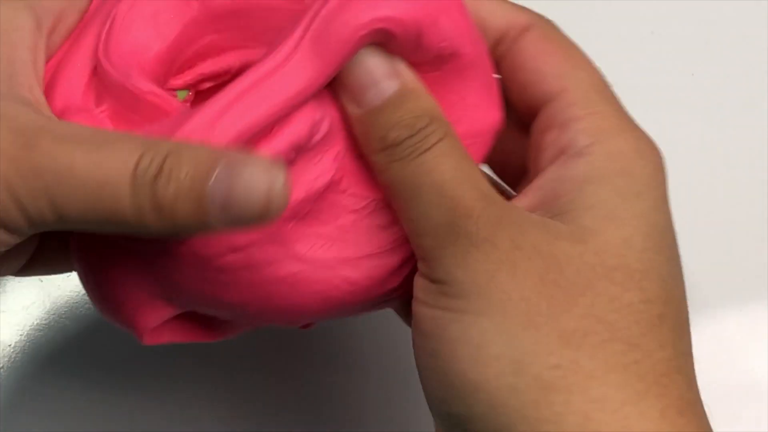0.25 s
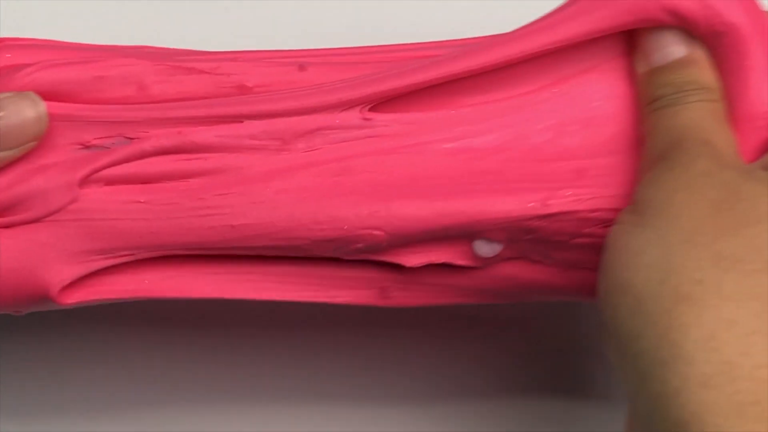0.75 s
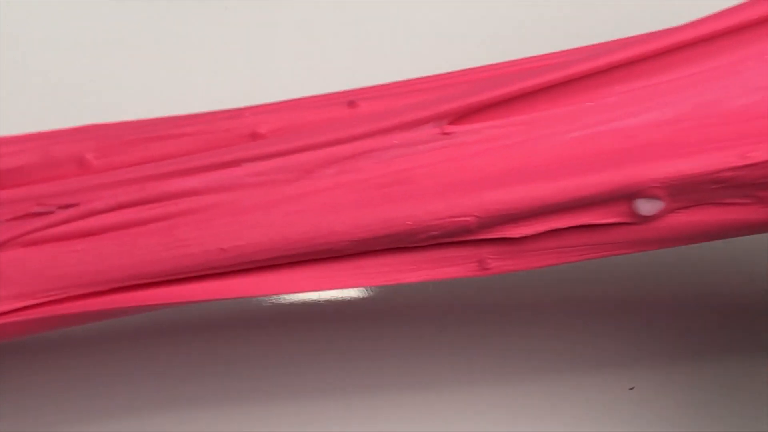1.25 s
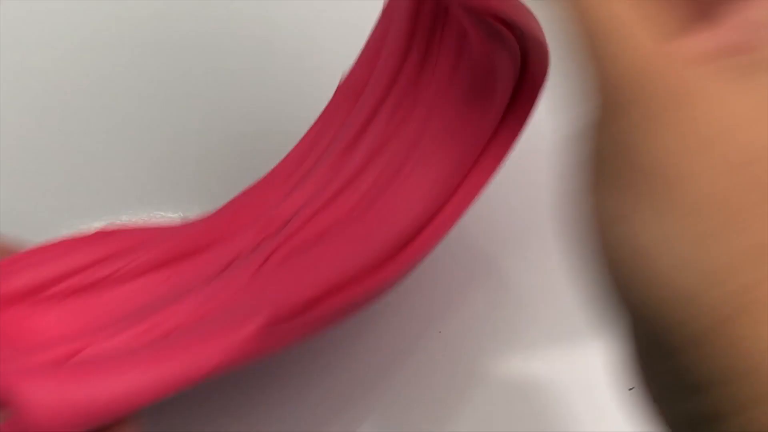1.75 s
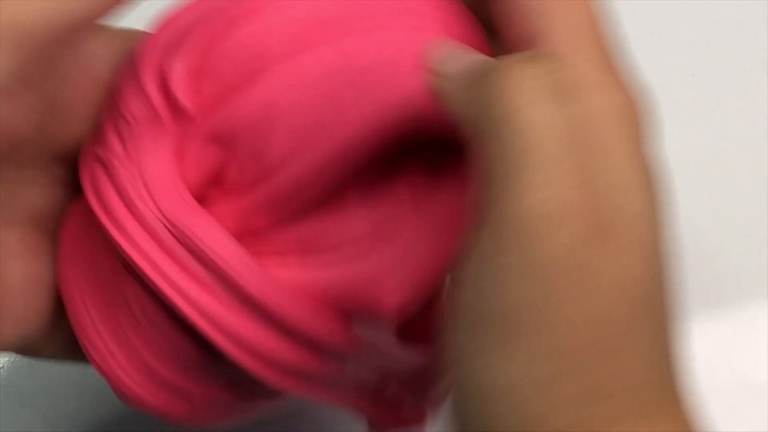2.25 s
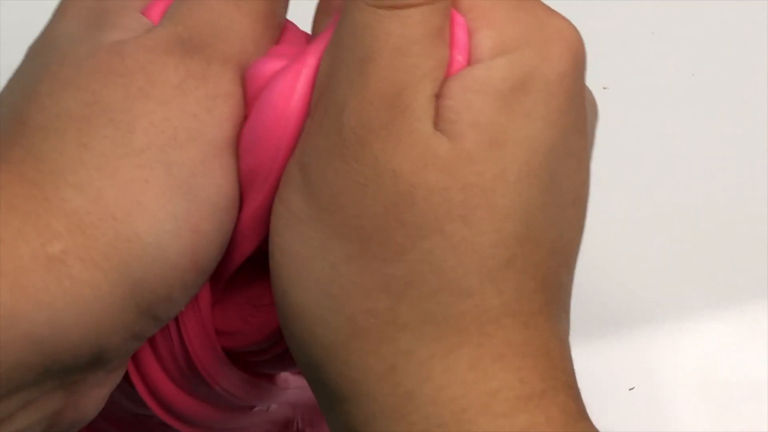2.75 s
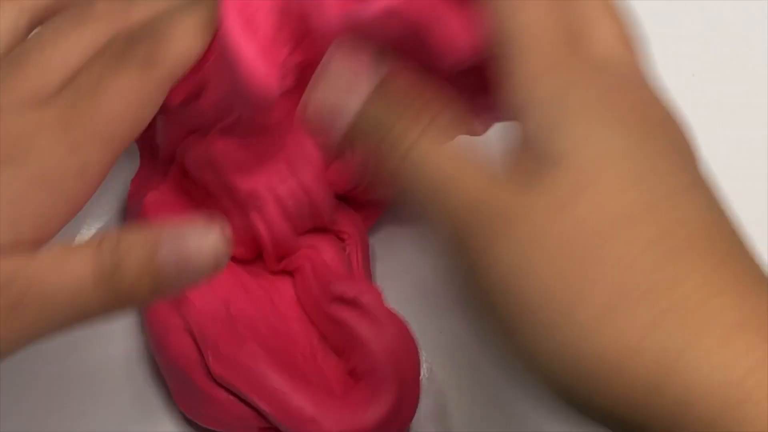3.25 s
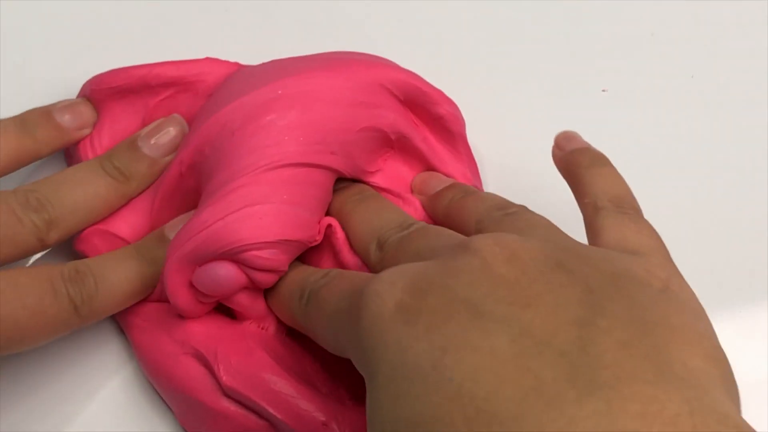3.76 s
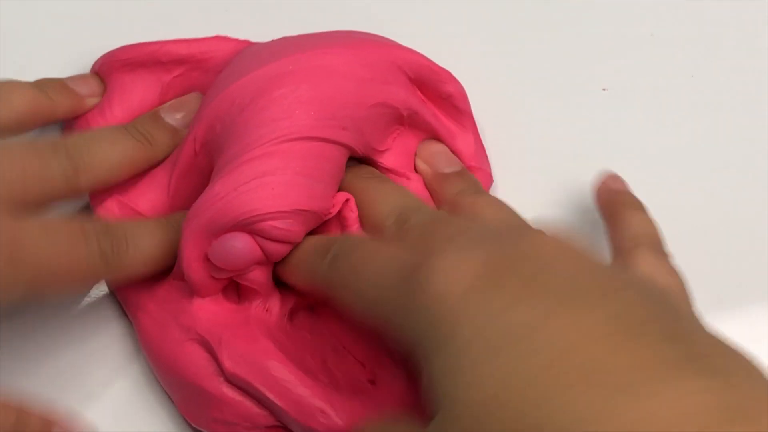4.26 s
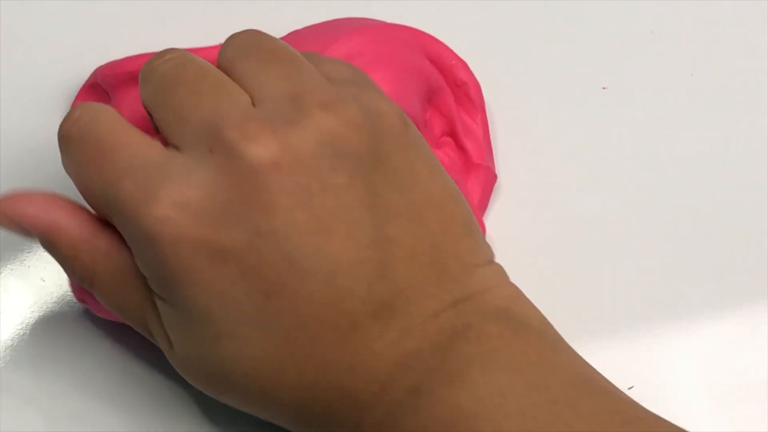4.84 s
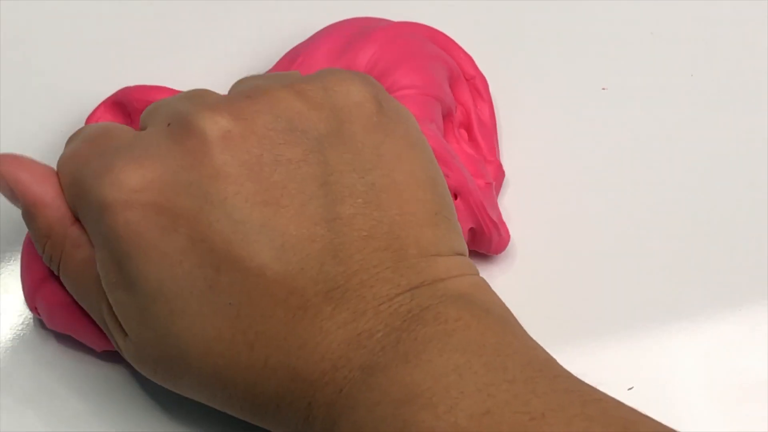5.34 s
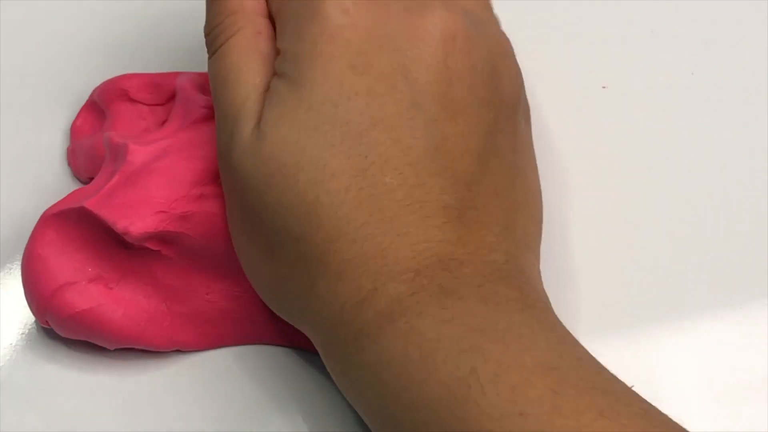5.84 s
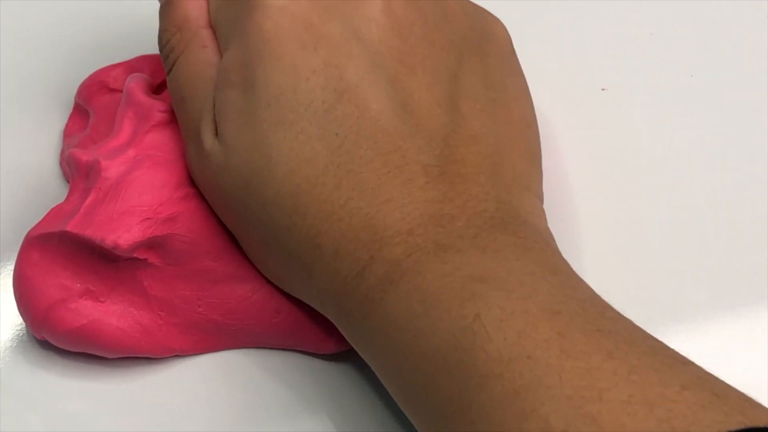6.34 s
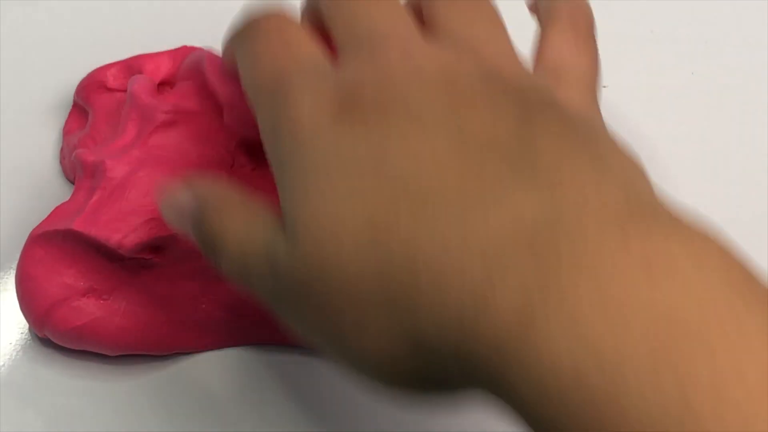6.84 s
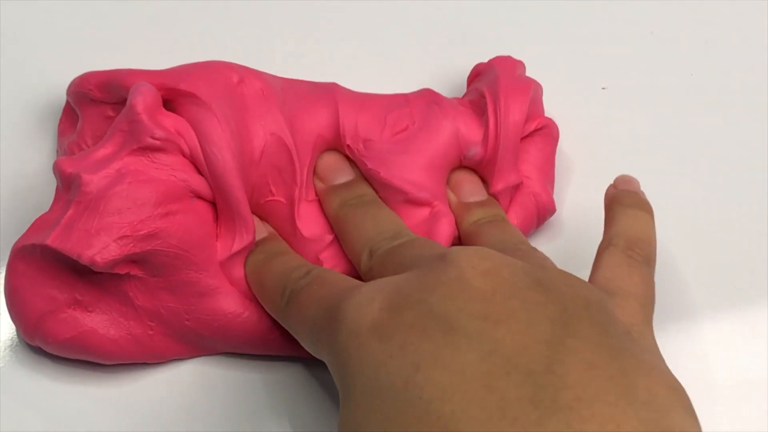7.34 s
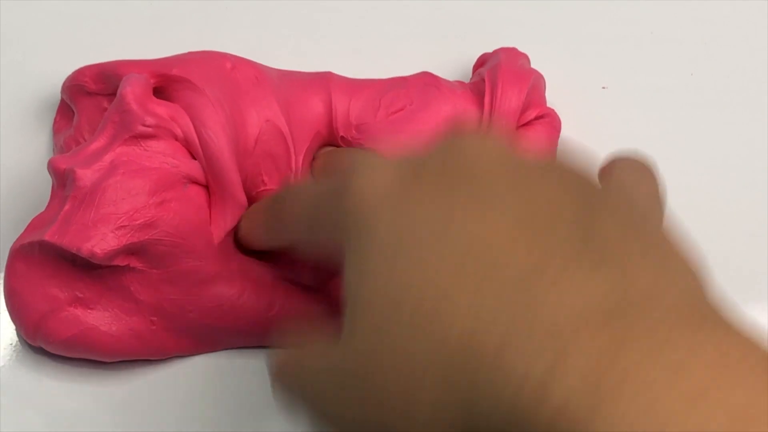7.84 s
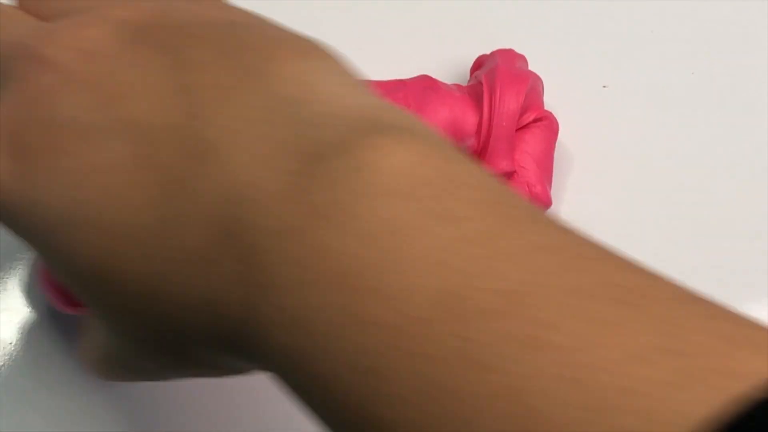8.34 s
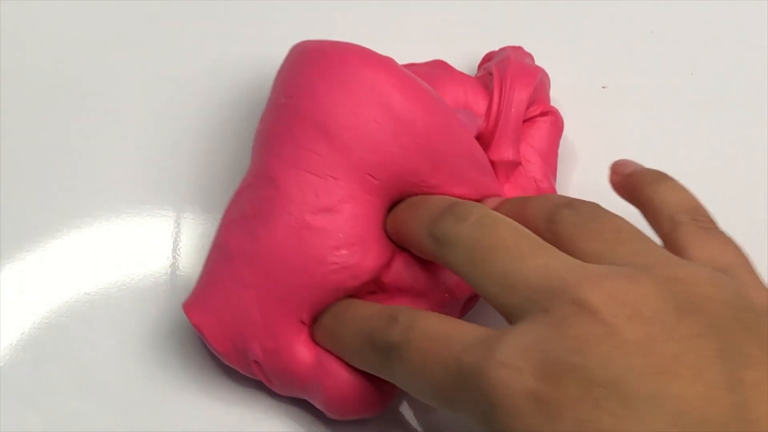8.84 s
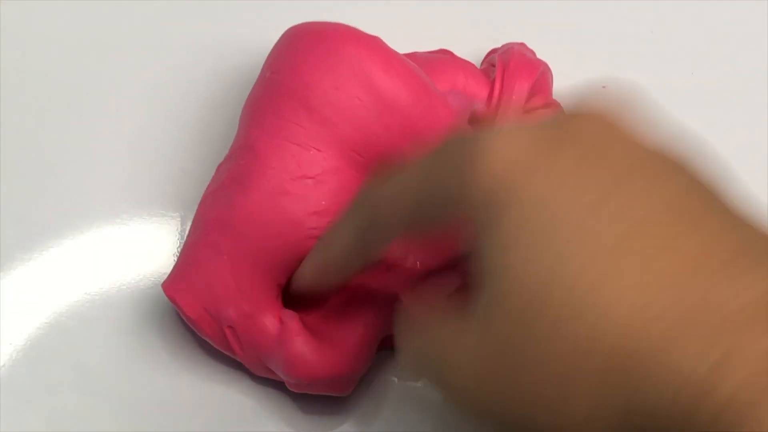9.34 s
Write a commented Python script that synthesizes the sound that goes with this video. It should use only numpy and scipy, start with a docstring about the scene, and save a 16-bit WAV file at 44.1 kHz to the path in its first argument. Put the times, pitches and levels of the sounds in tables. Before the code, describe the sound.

Thick slime is stretched, folded and pressed by hand, with sharp bubble pops, sticky crackles and soft bumps over a faint hum.

```python
"""A small room, a phone close to a table: thick slime is stretched, folded and pressed by hand.
Trapped bubbles burst with sharp pops, folds open with falling plops, air squeaks through slits,
and sticky skin peels off with a fine fizz. Presses bump the table.
Tabletop and walls echo over a faint ventilation hum; the loudest pops overload the phone."""
import sys
import numpy as np
from scipy import signal
from scipy.fft import rfft, irfft, next_fast_len
from scipy.io import wavfile
from scipy.ndimage import uniform_filter1d, map_coordinates

SR = 44100
rng = np.random.default_rng(int(sys.argv[2]) if len(sys.argv) > 2 else 0)


def to_wav(s):
    """Save 16-bit WAV."""
    ch = np.atleast_2d(s).T  # columns
    pcm = np.round(np.clip(ch, -1, 1) * 32767)  # PCM
    wavfile.write(sys.argv[1], SR, pcm.astype(np.int16))


N = 423360

# skin peeling, air squeezed out: peak t/s, length/s, level/dB, tilt/(dB/octave)
PEELS = [(0.078, 0.086, -53.5, -0.5), (0.317, 0.078, -54, -1.5), (0.39, 0.063, -55.5, -2),
         (1.684, 0.24, -57, 0.5), (1.687, 0.026, -38.5, -0.5), (2.245, 0.065, -49, -0.5),
         (2.356, 0.11, -59.5, -0.5), (2.579, 0.11, -58.5, 1), (2.675, 0.05, -51.5, -1.5),
         (2.889, 0.07, -42.5, 0), (3.061, 0.056, -57.5, -1), (3.095, 0.022, -39.5, 5),
         (3.166, 0.11, -38.5, -0.8), (3.257, 0.12, -44, -0.5), (3.595, .024, -52.5, -2),
         (4.386, 0.081, -42, 0), (4.415, 0.041, -41, -7.5), (4.638, .14, -53, -2.5),
         (4.735, 0.092, -48, -1), (5.608, 0.075, -34, -3), (5.649, 0.044, -35, -3), (5.86, .02, -35, -5.5),
         (6.114, .05, -29, -5), (6.345, 0.044, -28.5, 3), (6.694, 0.091, -39.5, -1.2),
         (6.787, 0.064, -40.5, -4), (6.868, .06, -49, -2.5), (7.051, 0.24, -61.5, 0.5),
         (7.981, 0.069, -49, -1), (8.279, .14, -53, -2.5), (8.401, 0.27, -55.5, 3.5), (8.579, .15, -57, 1),
         (9.44, 0.057, -38, -3)]
SWELL_SHARE = .3  # rising part of a peel's length
ROOM_DB, ROOM_T60_S, ROOM_TREBLE_T60_S = -10.5, 0.34, 0.18
POP_Q = 2.5  # wide cavity


def undb(db):
    """Decibels to gain."""
    return 10 ** (np.asarray(db) / 20)


def unit(x):
    """Scale to rms 1."""
    return x / np.sqrt(np.mean(x ** 2))


def colour(x, points, tilt_db_oct=0):
    """Filter by (f/Hz, level/dB) points, tilted about 4 kHz."""
    size = next_fast_len(len(x))
    octave = np.log2(np.maximum(np.arange(size // 2 + 1) * SR / size, 1))
    hz, db = np.transpose(points)
    gain = undb(np.interp(octave, np.log2(hz), db) + tilt_db_oct * (octave - np.log2(4000)))
    return irfft(rfft(x, size) * gain, size)[:len(x)]


def cut(x, hz, kind, order=2):
    """High-pass or low-pass."""
    return signal.sosfilt(signal.butter(order, min(hz, .45 * SR), kind, fs=SR, output="sos"), x)


def walk(rate_hz, size):
    """Smooth random wander, spread near 1."""
    knots = rng.standard_normal(4096)
    return map_coordinates(knots, [np.arange(size) * rate_hz / SR], order=3, mode="wrap")


def add(out, s, x):
    """Mix x into out from time s."""
    i = int(round(s * SR))
    x = x[max(-i, 0):max(len(out) - i, 0)]
    out[max(i, 0):max(i, 0) + len(x)] += x


def ventilation(air_db=-55.5, waver_db=1.43):
    """Air rumble, faint hiss and wavering fan tones."""
    # air spectrum: f/Hz, level/dB
    air_spectrum = [(15, -62.5), (25, -35.5), (43, -15), (86, -8.5), (116, -1.5), (148, -10), (253, -14),
                    (289, -14.5), (322, -19), (368, -17), (399, -21), (509, -25), (1200, -34.5),
                    (5880, -42.5), (15500, -43.5)]
    # fan tones: f/Hz, width/Hz, level/dB
    fan_tones = [(56.2, 6.5, -66), (124.1, 14, -60.5), (289, 10, -65), (380, 15, -79.5)]
    out = unit(colour(rng.standard_normal(N), air_spectrum)) * undb(air_db - waver_db * walk(5.1, N))
    t = np.arange(N) / SR
    for hz, width_hz, db in fan_tones:
        drift = 1 + .5 * (walk(2 * width_hz, N) + 1j * walk(2 * width_hz, N))
        out += undb(db) * unit(np.real(drift * np.exp(2j * np.pi * hz * t)))
    return out


def room(x, build_s=0.0046, split_hz=5000, near_db=-3, near_s=0.017, jitter=0.066, mirror_hz=700):
    """Direct sound, echoes and a short diffuse tail; redrawn per call, as the hands move."""
    # tail spectrum: f/Hz, level/dB
    tail_spectrum = [(100, 1.5), (400, -0.5), (900, -3), (2800, 0.5), (6000, -3.5), (15000, -1)]
    # tabletop, then near walls: delay/ms, level/dB
    reflections = [(1.7, -6), (6.2, -16.5), (8.4, -23.5), (15.6, -19.5)]
    t = np.arange(SR // 3) / SR
    noise = colour(rng.standard_normal(len(t)), tail_spectrum)
    low = cut(noise, split_hz, "low", order=1)
    tail = low * undb(-60 * t / ROOM_T60_S) + (noise - low) * undb(-60 * t / ROOM_TREBLE_T60_S)
    tail += undb(near_db) * noise * np.exp(-t / near_s)
    tail *= 1 - np.exp(-t / build_s)
    echoes = np.zeros(len(t))
    for ms, db in reflections:
        add(echoes, ms * (1 + jitter * rng.standard_normal()) / 1000, undb([db]))
    # small surfaces mirror only short waves
    response = undb(ROOM_DB) * tail / np.linalg.norm(tail) + cut(echoes, mirror_hz, "high", order=1)
    response[0] = 1
    return signal.fftconvolve(x, response)


def background_gain(ease_s=.08):
    """Level of the soft background fizz: slime rustle, and the room's wash between the loud pops."""
    # background fizz, one list per stretch: t/s, level/dB
    stretches = [
        [(0.3, -66), (1.28, -71.5), (2.15, -67), (2.22, -62.5), (2.9, -58), (3.05, -52), (3.15, -49),
         (3.6, -65.5), (4.2, -70.5)],
        [(4.45, -69), (4.808, -55.5), (5.022, -55.5), (5.072, -56.5), (5.24, -47), (5.52, -50.5), (5.688, -66),
         (5.906, -65), (6.08, -58)],
        [(6.95, -62.5), (7.22, -70.5), (7.9, -72), (8.29, -69.5), (8.41, -55), (8.49, -56), (8.63, -64.5),
         (8.82, -69), (9.35, -70.5)],
    ]
    t = np.arange(N) / SR
    gain = sum(np.interp(t, s, undb(db), left=0, right=0) for s, db in map(np.transpose, stretches))
    return np.maximum(uniform_filter1d(gain, int(ease_s * SR)), 0)


def fizz(size, tilt_db_oct, snaps_per_s=1800, scatter_db=4, hiss_db=-3, catch_db=2.5, catch_hz=90,
         fold_hz=1600, fold_q=3, fold_db=-2, hollow_db=-5, hollow_s=.004):
    """Tiny threads snap over escaping air, in fits as the skin catches and lets go."""
    # snap and hiss spectrum: f/Hz, level/dB
    spectrum = [(210, -28.5), (350, -8.5), (774, -12), (906, -6), (1110, -6.5), (1940, -10), (4720, -5.5),
                (5190, -6.5), (7470, -6.5), (15500, -13)]
    snaps = rng.random(size) < snaps_per_s / SR
    strengths = undb(scatter_db * np.minimum(rng.exponential(size=size), 5)) * rng.choice([-1, 1], size)
    x = colour(unit(snaps * strengths) + undb(hiss_db) * rng.standard_normal(size), spectrum, tilt_db_oct)
    # wet fold between skin and slime resonates
    centre_hz = fold_hz * np.exp(0.29 * rng.standard_normal())
    x += undb(fold_db) * signal.lfilter(*signal.iirpeak(centre_hz, fold_q, fs=SR), x)
    # hollow of the hand rings briefly
    t = np.arange(SR // 50) / SR
    hollow = rng.standard_normal(len(t)) * np.exp(-t / hollow_s)
    x += undb(hollow_db) * signal.fftconvolve(x, hollow / np.linalg.norm(hollow))[:size]
    return unit(x) * undb(catch_db * walk(catch_hz, size))


def background_fizz(gain, rel_db=-4, waver_db=2, waver_hz=22):
    """Faint wavering fizz: slime creeping over skin, and room wash between the loud pops."""
    return gain * undb(rel_db + waver_db * walk(waver_hz, N)) * fizz(N, tilt_db_oct=-2.04)


def prickle(gain, count=120, base_db=-55, scatter_db=4, centre_hz=3800):
    """Pinhead bubbles burst at random, more often where the background fizz is louder."""
    out, cumulative = np.zeros(N), np.cumsum(np.sqrt(gain))
    for when, size, pitch in rng.random((count, 3)):
        s = np.searchsorted(cumulative, when * cumulative[-1]) / SR
        db = base_db - scatter_db * np.log(size + 0.031)
        add(out, s, undb(db) * pop(centre_hz * 2 ** (2 * pitch - 1), POP_Q, crack_db=-5.5))
    return out


def thuds(low_hz=65, high_hz=190, push_s=0.0023, decay_s=0.048):
    """Slime pushed against the table: soft, pitchless bumps."""
    # presses: t/s, level/dB
    presses = [(0.398, -44.5), (4.30, -44), (4.399, -37.5), (4.698, -47), (5.614, -34.5), (5.861, -36),
               (6.682, -37.5), (7.969, -42), (8.239, -39), (9.445, -29.5)]
    out, t = np.zeros(N), np.arange(SR // 2) / SR
    for s, db in presses:
        noise = cut(rng.standard_normal(len(t)), low_hz, "high", order=4)
        body = unit(cut(noise, high_hz, "low", order=3))
        add(out, s, undb(db) * body * (1 - np.exp(-t / push_s)) * np.exp(-t / decay_s))
    return out


def bubble(hz, halve_s, decay_s, rest_hz=200):
    """A widening cavity: short ring, falling pitch."""
    t = np.arange(1024) / SR
    pitch_hz = rest_hz + (hz - rest_hz) / (1 + t / halve_s)
    return np.exp(-t / decay_s) * np.sin(2 * np.pi * np.cumsum(pitch_hz) / SR)


def squelches(per_peel=5, rel_db=-3, scatter_db=3, centre_hz=1900, spread=0.28):
    """Tiny wet pockets chirp open around each peel."""
    out = np.zeros(N)
    for s, length_s, db, _ in PEELS:
        for when, size, pitch in rng.standard_normal((per_peel, 3)):
            chirp = bubble(centre_hz * np.exp(spread * pitch), halve_s=.03, decay_s=.0025)
            share = SWELL_SHARE if when < 0 else 1 - SWELL_SHARE
            add(out, s + 0.66 * when * share * length_s, undb(db + rel_db + scatter_db * size) * chirp)
    return out


def peels():
    """Skin leaves the slime: fizz swells fast, fades slower."""
    out = np.zeros(N)
    for s, length_s, db, tilt_db_oct in PEELS:
        swell_s, fade_s = SWELL_SHARE * length_s, (1 - SWELL_SHARE) * length_s
        t = np.arange(-2 * swell_s, 2 * fade_s + .12, 1 / SR)
        envelope = np.exp(-(t / np.where(t < 0, swell_s, fade_s)) ** 2)
        # palm-wide source: room wash, no distinct echoes
        wash = undb(ROOM_DB - 60 * np.abs(t) / ROOM_T60_S) * (t > 0)
        add(out, s + t[0], undb(db) * np.hypot(envelope, wash) * fizz(len(t), tilt_db_oct))
    return out


def squeaks(open_s=0.00056, wobble=0.041, rough=0.51, sag_s=0.62):
    """Air whistles through a slit; pitch sags as it widens."""
    # slits: t/s, level/dB, f/Hz, decay/ms
    slits = [(1.703, -34, 953, 15), (2.226, -55, 2730, 27), (2.258, -51, 1296, 12), (6.102, -15.5, 3160, 7),
             (6.816, -39, 1290, 7.5), (6.865, -36.5, 1160, 6.4)]
    out, t = np.zeros(N), np.arange(SR // 6) / SR
    for s, db, hz, decay_ms in slits:
        pitch_hz = hz / (1 + t / sag_s) * np.exp(wobble * walk(250, len(t)))
        envelope = (1 - np.exp(-t / open_s)) * np.exp(-1000 * t / decay_ms)
        envelope *= 1 + rough * walk(251, len(t))
        add(out, s, room(undb(db) * envelope * np.sin(2 * np.pi * np.cumsum(pitch_hz) / SR)))
    return out


def pocket(hz, rest_hz=90, open_s=0.00035, halve_cycles=3.8, decay_cycles=7.4, wobble=.13, rough=0.92):
    """An air pocket grows, so its resonance falls; soft walls make it uneven."""
    t = np.arange(SR // 5) / SR
    cycles = hz * t  # large, low pockets fall and fade slowly
    pitch_hz = rest_hz + (hz - rest_hz) / (1 + cycles / halve_cycles)
    pitch_hz *= np.exp(wobble * walk(410, len(t)))
    envelope = (1 - np.exp(-t / open_s)) * np.exp(-cycles / decay_cycles)
    envelope *= 1 + rough * walk(500, len(t))
    return envelope * np.sin(2 * np.pi * np.cumsum(pitch_hz) / SR)


def plops():
    """Folds of slime pulled open."""
    # opening folds: t/s, level/dB, starting f/Hz
    folds = [(1.6856, -22, 2060), (1.695, -31, 2080), (1.7, -33, 1500), (3.9731, -37, 756),
             (4.417, -37.5, 451), (4.678, -42.5, 1630), (4.693, -42.5, 285), (5.611, -34, 270),
             (5.633, -31.5, 233), (5.856, -22.5, 650), (5.876, -32, 418), (6.682, -39, 288),
             (6.779, -42.5, 358), (7.941, -31.5, 1450), (7.998, -35, 675), (8.223, -40, 327),
             (8.244, -38.5, 640), (8.483, -48, 1090), (9.436, -15.5, 1860), (9.448, -35, 336),
             (9.47, -26, 593)]
    out = np.zeros(N)
    for s, db, hz in folds:
        add(out, s, room(undb(db) * pocket(hz)))
    return out


def pop(hz, q, crack_db, tear_s=.0004, shred_s=0.0027, shred_db=-18, cutoff_ratio=1.61,
        gulp_db=-17, gulp_hz=2600, linger_db=-20.5, linger_s=0.0062):
    """The film cracks and its shreds crackle; the cavity rings a few cycles and gulps open."""
    # film crack spectrum: f/Hz, level/dB
    crack_spectrum = [(300, -11), (1500, -1.5), (4000, 0), (7000, 2.5), (11000, -4), (16000, -7)]
    t = np.arange(1024) / SR
    ring = np.exp(-np.pi * hz * t / q) * np.cos(2 * np.pi * hz * t)
    ring[0] /= 2
    ring = cut(ring, cutoff_ratio * hz, "low", order=4)
    ring /= np.abs(ring).max()
    tearing = np.exp(-t / tear_s) + undb(shred_db) * np.exp(-t / shred_s)
    crack = unit(colour(rng.standard_normal(len(t)) * tearing, crack_spectrum)) * np.std(ring)
    # escaping air keeps the cavity sounding
    linger = unit(signal.fftconvolve(rng.standard_normal(len(t)), ring)[:len(t)]) * np.exp(-t / linger_s)
    # large, low bubbles gulp most
    gulp = bubble(gulp_hz, halve_s=0.00096, decay_s=0.0011) * min(gulp_hz / hz, 1)
    direct = ring + undb(crack_db) * crack + undb(linger_db) * linger + undb(gulp_db) * gulp
    return cut(direct, 260, "high")


def pops(wide_hz=2720, damping_power=0.43, lag_s=.0008, pocket_ratio=.55, pocket_db=-17.5, fall_db_oct=22):
    """Bubbles burst under the hand; wide ones leave a lower plop, narrow ones hardly do."""
    # bursting bubbles: t/s, level/dB, cavity f/Hz, crack re ring/dB
    bursts = [(0.301, -37.5, 2300, 1), (0.658, -43, 1550, -11), (0.967, -42.5, 8900, -3),
              (2.082, -41.5, 2580, 0.5), (2.633, -39.5, 2620, 3.5), (2.84, -27.5, 3240, 0),
              (2.868, -30.5, 1710, 11), (2.88, -17.5, 4600, 5.5), (2.971, -25, 3950, 4.5),
              (3.325, -28, 1520, -9), (3.9735, -37, 2080, -17), (4.982, -26.5, 3514, -0.5),
              (5.0259, -8.5, 2980, -16.5), (5.074, -25.5, 7020, -7.5), (5.092, -27.5, 3450, -2.5),
              (5.123, -25.5, 4010, -3), (5.171, -17, 3980, 3), (5.2477, -3, 3530, 5.5),
              (5.2890, 5, 8500, -19), (5.3414, -4.5, 3020, -7), (5.3982, -19, 9300, -7),
              (5.434, -1, 6620, 0.5), (5.597, -19.5, 2380, -21), (5.855, -29.5, 1903, 4.5),
              (6.1033, 4, 2750, -24.5), (6.1167, -14, 3200, -23.5), (6.144, -13, 5000, -4),
              (6.191, -15, 2357, -4.5), (6.2665, 3.5, 4290, -10.5), (6.282, -15.5, 4465, -13),
              (6.303, -13, 2395, -12.5), (6.3297, -4, 2000, -14.5), (6.3324, 4.5, 2902, 2.5),
              (7.938, -23.5, 5600, -2.5), (8.362, -26.5, 8300, 0.5), (8.888, -43, 6000, -2),
              (9.4336, -14, 2500, 1.5), (9.451, -13.5, 4200, 3), (9.471, -18, 9240, 0)]
    out = np.zeros(N)
    for s, db, hz, crack_db in bursts:
        burst = np.zeros(SR // 10)
        q = POP_Q * (wide_hz / hz) ** damping_power  # soft walls damp small cavities more
        add(burst, 0, pop(hz, q, crack_db))
        plop_db = pocket_db - fall_db_oct * max(np.log2(hz / wide_hz), 0)
        add(burst, lag_s, undb(plop_db) * pocket(pocket_ratio * hz))
        add(out, s, room(undb(db) * burst))
    return out


def scene():
    """Slime over the hum, mono."""
    gain = background_gain()
    wet_ticks = room(squelches() + prickle(gain))[:N]
    slime = pops() + plops() + squeaks() + thuds() + peels() + background_fizz(gain) + wet_ticks
    return (slime + ventilation())[None]


def record(dry):
    """The phone clips the loudest pops and passes 40 Hz to 15.75 kHz."""
    clipped = cut(np.clip(dry, -1, 1), 40, "high")
    return signal.sosfilt(signal.ellip(10, .1, 80, 15750, fs=SR, output="sos"), clipped)


dry = scene()
out = record(dry)
to_wav(out)
```